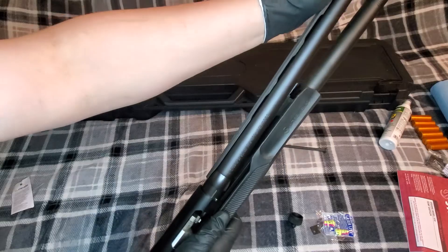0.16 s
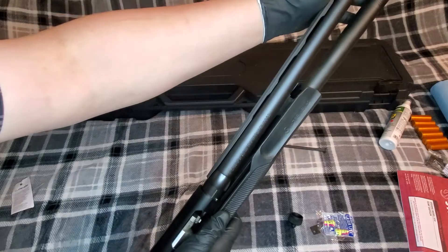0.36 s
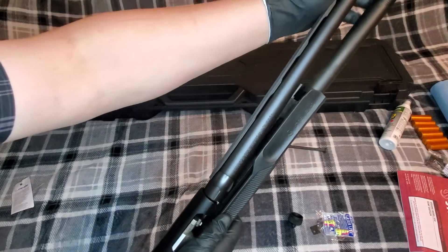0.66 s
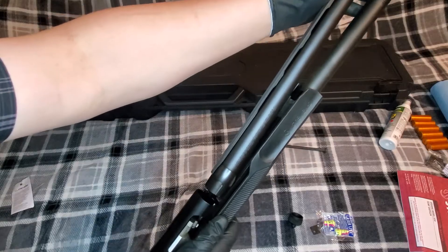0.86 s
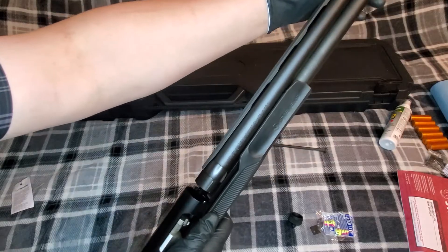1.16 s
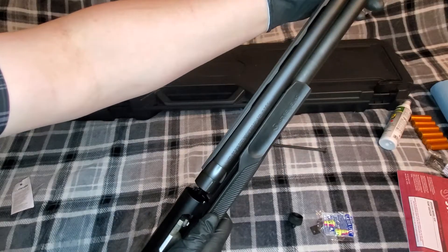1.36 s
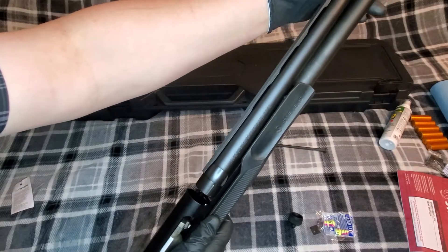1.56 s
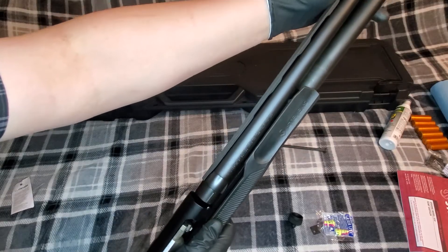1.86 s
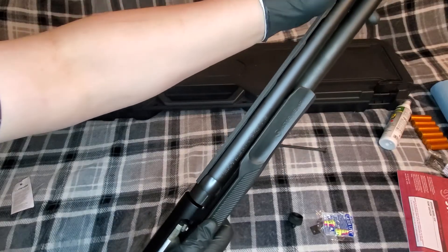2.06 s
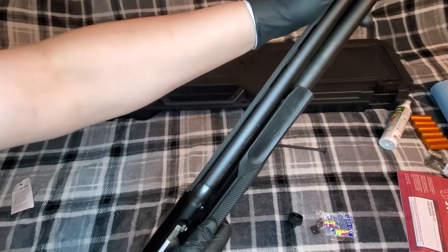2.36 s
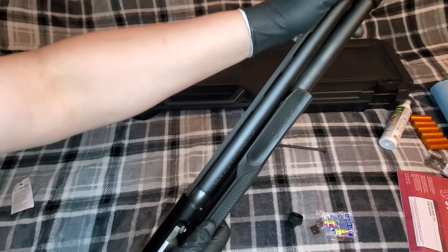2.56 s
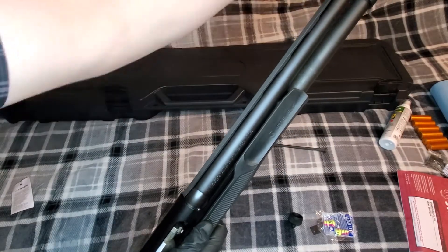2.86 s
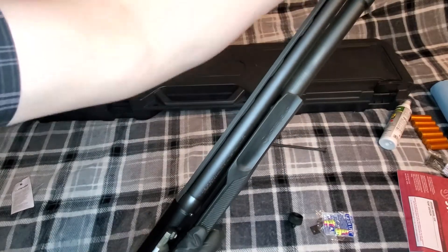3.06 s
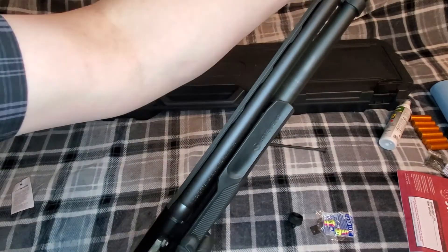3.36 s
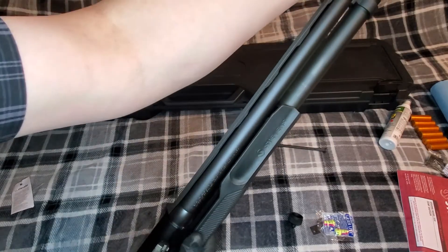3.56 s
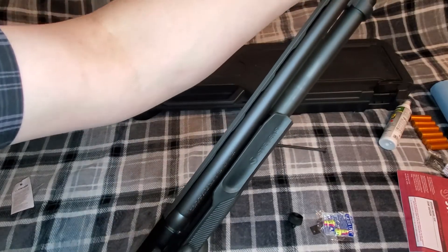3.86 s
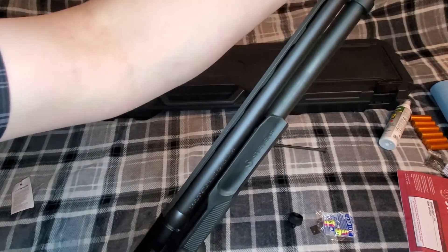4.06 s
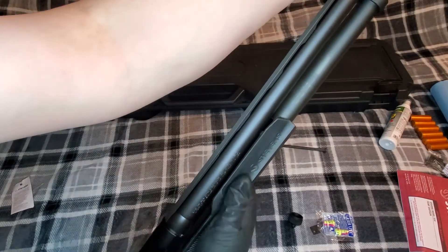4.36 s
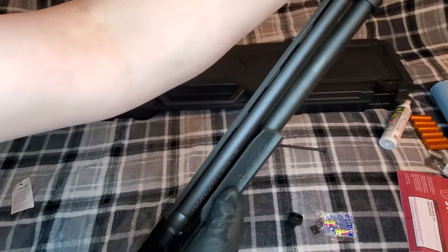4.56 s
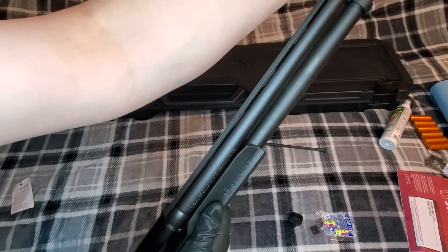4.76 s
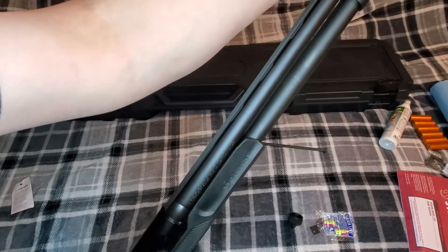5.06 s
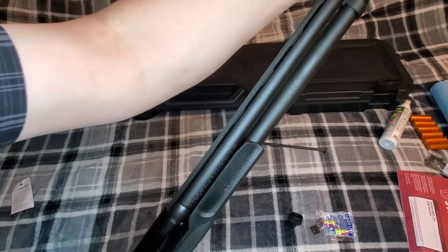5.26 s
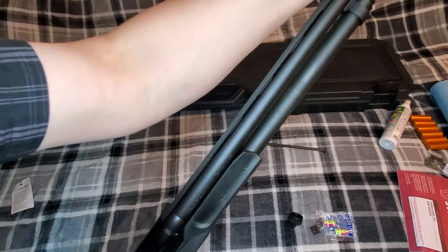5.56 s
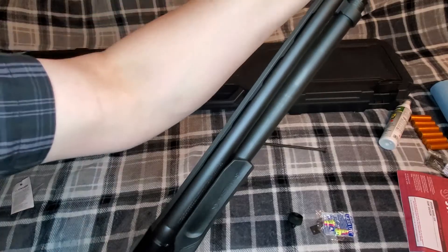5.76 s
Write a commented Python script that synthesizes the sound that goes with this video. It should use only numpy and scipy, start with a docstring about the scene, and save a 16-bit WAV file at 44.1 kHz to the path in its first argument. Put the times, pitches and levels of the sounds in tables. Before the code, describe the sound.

Hollow steel parts are fitted together by gloved hands: scattered ringing taps, faint scraping, a hard double clack, and a quick cluster of clicks. After a pause with sleeve rustle come isolated clicks, a brief squeak and a rough sliding rattle ending in bright snaps. Glove swishes finish it. Dry, close indoor sound with a short soft room tail over low mains hum.

```python
"""In a bedroom, gloved hands fit a steel barrel and a sliding forend to a receiver, close to a small microphone.
Each knock is a noisy crack and clatter plus decaying tones for the ringing steel.
Sliding parts are rough grinding noise, and a short squeak is a gliding tone.
Sleeves, bedding and gloves are shaped hiss; thumps are low fading tones.
Steady air noise and a low wavering mains hum lie underneath."""
import sys
import numpy as np
from scipy import signal
from scipy.fft import rfft, irfft
from scipy.io import wavfile
from scipy.ndimage import uniform_filter1d

SR = 44100
rng = np.random.default_rng(int(sys.argv[2]) if len(sys.argv) > 2 else 0)


def unload_audio(sound):
    """Save the sound as a 16-bit wav file, at the path given as the first command line argument."""
    columns = np.transpose(np.atleast_2d(sound))
    # keep every value between -1 and 1, then stretch to whole-number steps
    steps = np.round(np.clip(columns, -1, 1) * 32767)
    wavfile.write(sys.argv[1], SR, steps.astype(np.int16))


N = 260366

# body, middle and treble of a noise: low_hz, high_hz
BAND_EDGES = [(380, 2000), (2000, 7200), (7200, 16500)]
# colour of metal grinding and clattering: pitch_hz, relative_db
METAL_COLOUR = [(230, -10.5), (420, 0.5), (1100, 1.5), (2500, -1), (5000, -0.46)]
# ringing tones of the barrel and of the magazine tube: pitch_hz, relative_db, ring_time (a multiple)
BARREL_MODES = [(500, -6, .6), (637, -7.5, .6), (862, -5.5, 1.0), (1235, -5, .9), (1338, -4.6, .9),
                (1548, -5.5, 1), (1715, -11, 1.1), (2143, -4, 1.7), (2490, -6.5, 1.2), (3200, -9.5, 1.5),
                (3525, -9.5, 1), (4263, -9, 1.7), (5480, -12, .9)]
TUBE_MODES = [(1163, -1, 0.55), (2740, -6.5, 0.7), (3900, -6.5, 0.26), (5724, -9.5, 0.36)]


def undb(db):
    """Turn decibels into a plain gain."""
    return 10 ** (np.asarray(db) / 20)


def unit(x):
    """Scale a sound to an rms of 1."""
    return x / np.sqrt(np.mean(x ** 2))


def colour(x, points):
    """Shape the spectrum by (Hz, dB) points on a log-frequency axis."""
    hz, db = np.transpose(points)
    log_hz = np.log(np.arange(len(x) // 2 + 1) * SR / len(x) + 1)
    gain = undb(np.interp(log_hz, np.log(hz), db))
    return irfft(rfft(x) * gain, len(x))


def bands(x):
    """Split a noise into body, middle and treble, each at rms 1."""
    layers = []
    for edges in BAND_EDGES:
        band_filter = signal.butter(2, edges, "bandpass", fs=SR, output="sos")
        layers.append(unit(signal.sosfilt(band_filter, x)))
    # flipping the middle keeps the bands in phase where they meet
    return np.array(layers) * [[1], [-1], [1]]


def ring(x, hz, t60):
    """One steel tone set ringing by x; it falls 60 dB in t60 seconds."""
    pole = np.exp(2j * np.pi * hz / SR - np.log(1000) / (t60 * SR))
    return signal.lfilter([1], [1, -pole], x).imag


def walk(rate):
    """A wandering curve: random values, rate per second, with smooth slides between them."""
    hold = int(SR / rate)
    steps = np.repeat(rng.standard_normal(N // hold + 1), hold)
    return uniform_filter1d(steps, hold)[:N]


def rustle():
    """Sleeves and bedding rub in a dull hiss whose three bands waver separately."""
    # loudness over time: time_s, level_db
    rustle_levels = [(0, -49), (.45, -59), (.8, -54.5), (1.301, -51), (1.901, -53), (2.601, -54.5),
                     (2.851, -68.5), (3.1, -47), (3.301, -61.5), (3.601, -53.5), (3.902, -64), (4.3, -53),
                     (4.9, -62), (5.452, -54), (5.62, -67), (5.9, -72.5)]
    # offsets of body, middle and treble: relative_db
    band_levels = (2.5, -14.5, -25)
    # colour of rubbing cloth: pitch_hz, relative_db
    cloth_colour = [(200, 17), (450, 9.5), (800, -1.5), (1500, -0.5), (3000, -10.5)]
    time_s, level_db = np.transpose(rustle_levels)
    t = np.arange(N) / SR
    layers = bands(colour(rng.standard_normal(N), cloth_colour))
    level = np.interp(t, time_s, level_db)
    return sum(x * undb(level + db + walk(33)) for x, db in zip(layers, band_levels))


def glove_strokes():
    """Each glove stroke over the steel is a bright swish of noise that swells and fades."""
    # strokes: peak_s, half_length_s, level_db
    strokes = [(0.157, 0.028, -57.5), (2.664, 0.025, -57), (2.733, 0.0086, -52.5), (2.863, 0.062, -49),
               (2.993, 0.022, -50), (3.434, 0.074, -58.5), (4.198, 0.011, -47), (4.349, 0.0052, -47),
               (5.043, 0.04, -44), (5.161, 0.051, -47.5), (5.444, 0.049, -47)]
    # colour of a stroke: pitch_hz, relative_db
    glove_colour = [(2000, -5), (3500, -1), (5000, 1.5), (7400, -1.5), (10000, 1), (15500, -2)]
    t = np.arange(N) / SR
    hiss = unit(colour(rng.standard_normal(N), [(20, -33)] + glove_colour))
    swish = undb(1.6 * walk(60)) * hiss
    return swish * sum(undb(db) * np.exp(-.5 * ((t - at) / half) ** 2) for at, half, db in strokes)


def room_air():
    """Steady air noise, shaped mostly towards the low end."""
    # colour of the air: pitch_hz, relative_db
    air_colour = [(24, -24), (40, -1), (114, 2), (165, -3.5), (495, -17.5), (677, -28), (1000, -29.5),
                  (3530, -42), (6440, -27.5), (7350, -39.5), (15700, -43.5)]
    return undb(-55.5) * unit(colour(rng.standard_normal(N), air_colour))


def mains_hum():
    """Two low tones that waver together in pitch and separately in level."""
    # hum before wavering: pitch_hz, rms_level_db
    hum_tones = [(59, -58), (119.8, -57.5)]
    turns = 2 * np.pi / SR * np.cumsum(1 + 0.04 * walk(6))
    return sum(np.sqrt(2) * undb(db + 0.63 * walk(28.0)) * np.sin(hz * turns) for hz, db in hum_tones)


def knocks(ping_db=-4.5, ping_s=0.0008, chatter_size=0.011,
           struck_db=-7., scatter_db=1.2, split=.009, spot_db=7., spot_width=.05):
    """Each blow is a sharp crack, then clatter and steel tones fed while the contact chatters."""
    # blows: start_s, level_db, body_db (below 2 kHz), treble_db (above 7.2 kHz),
    # tube_db (tube ring against barrel ring), tail_db (tail against crack),
    # contact_ms (until the crack peaks), spot_hz (pitch that the struck spot favours)
    blows = [(0.4972, -25.5, 2, -24, 5.5, -14, 1, 6000), (0.6525, -50.5, 0, -8, -35, 6.5, 0.83, 2148),
             (0.7237, -31, 1, -8, 5.5, -10.5, 1.8, 2820), (0.842, -51.5, 1, -8, 4, -9, 1.5, 5820),
             (0.867, -32.5, 2, -18, 18, -19.5, 0.79, 2750), (0.8813, -31, -2, 0.5, -21, -16, 0.67, 1715),
             (0.91, -40, 0, 2.5, 5, -5.5, 0.86, 5600), (1.04, -35.5, 9, -13, 7, -14, 1.6, 1580),
             (1.08, -47.5, -18, 5, 3, -13, 1, 5800), (1.4922, -42, 0, -30, 21, -12.5, 0.83, 5160),
             (1.6334, -42.5, 6, -11, 13, -7.5, 0.57, 3950), (1.713, -39.5, 13, -29, -18, -23, 1.6, 2100),
             (2.025, -35.5, -4, -14, -1, -0.5, 0.9, 2570), (2.0346, -14, 4.5, -1.5, -11, -15.5, 2.7, 1280),
             (2.1188, -34.5, 10, -14.5, -7, -6.5, 1, 1240), (2.1396, -28.5, -5, -4.5, -12, 1, 1.2, 6800),
             (2.1484, -5.5, -6, -4, 3.5, -29, 0.7, 6230), (2.411, -35, 2, -11, -6, -8, 1.1, 3440),
             (2.433, -30.5, 2, -7, -5, -10.5, 1.6, 3280), (2.447, -24.5, 2, -14, -1.5, -25, 1, 5500),
             (2.4575, -27, 11.5, -6, 0.5, -20.5, 1.5, 6240), (3.314, -57.5, 5, 10, -1, -15, 0.41, 4080),
             (3.7035, -27.5, 1, 0, -6.5, -14.5, 0.7, 3200), (4.046, -29, -40.5, 6.5, 0, -20.5, 1.45, 4980),
             (4.546, -31, 2.5, -10.5, -9, -6.5, 1.5, 4100), (4.619, -18, -0.5, 4.5, -1.5, -11, 0.83, 5200),
             (4.643, -30, 11, -13, 1, -35, 1.4, 1060), (4.659, -19, -8, -4.5, 0, -20.5, 0.71, 5330),
             (4.682, -13.5, -24.5, 9, 2.5, -18, 1, 5130)]
    # broad peaks of the first instant: pitch_hz, relative_db
    crack_peaks = [(3100, -1.5), (6200, 1), (9500, -1.5), (12700, -3.5), (15300, -2.5)]
    # the loose barrel rings freely; once seated in the receiver its ring is damped
    seated_s, loose_ring_db, seated_ring_db = 2.05, 5.5, -11
    ring_t60_s = 0.17  # scaled for each band and mode
    out, n = np.zeros(N + SR), SR // 3
    t = np.arange(n) / SR
    noise = bands(colour(rng.standard_normal(N + SR), METAL_COLOUR))
    white = rng.standard_normal(N + SR)
    hz, db, ring_time = np.transpose(BARREL_MODES + TUBE_MODES)
    crack_hz, crack_db = np.transpose(crack_peaks)
    band_t60 = ring_t60_s * np.array([[1.2], [.9], [.8]])
    mode_t60 = ring_t60_s * ring_time[:, None]
    snap = np.e * t / ping_s * np.exp(-t / ping_s)  # very short burst for the treble
    in_tube = np.arange(len(hz)) >= len(BARREL_MODES)
    chances = rng.standard_normal((len(blows), 2, len(hz)))
    for blow, chance in zip(blows, chances):
        start_s, level_db, body_db, treble_db, tube_db, tail_db, contact_ms, spot_hz = blow
        i = int(start_s * SR)
        crack_s = contact_ms / 1000
        crack = np.e * t / crack_s * np.exp(-t / crack_s)
        ring_db = loose_ring_db if start_s < seated_s else seated_ring_db
        share_db = np.array([body_db, 0, treble_db])

        # noise: a crack in every band, then the fading clatter
        clatter = (1 - np.exp(-t / crack_s)) * undb(tail_db - 60 * t / band_t60)
        burst = np.array([crack, crack, snap]) / 3
        hit = undb(share_db) @ (noise[:, i:i + n] * (burst + clatter))

        # short pings colour the first instant
        ping_hz = crack_hz * (1 + 0.055 * chance[1, :len(crack_peaks)])
        pings = np.sin(2 * np.pi * np.outer(ping_hz, t))
        ping_levels = ping_db + crack_db + treble_db * (crack_hz > BAND_EDGES[2][0])
        hit = hit + (crack * ping_s / crack_s + snap) / 2 * (undb(ping_levels) @ pings)
        hit = hit + crack * np.sin(2 * np.pi * spot_hz * t)

        # the part that is struck rings most, above all near the pitch of the spot
        mode_db = db + np.where(in_tube, tube_db, -tube_db).clip(max=0) + scatter_db * chance[0]
        mode_db = mode_db + spot_db * np.exp(-.5 * (np.log(hz / spot_hz) / spot_width) ** 2)
        share_hz = np.log([1750, 2070, 6660, 9000])
        mode_db = mode_db + np.interp(np.log(hz), share_hz, share_db[[0, 1, 1, 2]])

        # every steel tone is a slightly detuned, beating pair
        turns = 2 * np.pi * np.outer(hz * (1 + 0.006 * chance[1]), t)
        pairs = np.sin(turns) + np.sin(turns * (1 + split * chance[0, ::-1, None])) / 2
        modes = undb(mode_db) @ (pairs * undb(-60 * t / mode_t60))
        hit = hit + undb(struck_db) * crack * modes

        # one sharp tap plus brief noise keeps feeding the ring
        chatter = chatter_size * white[i:i + n] * crack + (t == 0)
        chatter = chatter / np.sqrt(np.sum(chatter ** 2))
        ringing = signal.fftconvolve(modes, chatter)[:n]
        out[i:i + n] += undb(level_db) * (hit + undb(ring_db + tail_db) * ringing)
    return out[:N]


def slides(grit_db=2.7, steel_db=-2., damp_s=.026):
    """Parts stick and slip as they slide: rough noise, some of it through the damped steel tones."""
    # slides: peak_s, rise_s and fall_s (time for 20 dB), level_db, body_db (below 2 kHz)
    slide_table = [(0.905, 0.096, 0.41, -48, 4.5), (1.558, 0.11, 0.0099, -46.5, 0),
                   (1.69, 0.067, 0.13, -43.5, 2.5), (2.021, 0.012, 0.068, -37, 4.5),
                   (2.143, 0.076, 0.11, -35.5, 6.5), (2.452, 0.079, 0.035, -34.5, 0.5),
                   (3.692, 0.023, 0.056, -34.5, -6), (4.041, 0.044, 0.1, -44.5, -1),
                   (4.534, 0.058, 0.02, -43, 7.5), (4.614, 0.038, 0.024, -33, -2.5),
                   (4.664, 0.054, 0.015, -29, 11.5), (4.7, 0.016, 0.095, -29.5, -40)]
    # extra colour of the forend on its rails: pitch_hz, relative_db
    forend_colour = [(600, -12), (1050, 1.5), (2500, -3.5), (3500, -1), (4300, 8), (5300, 6.5), (6500, 0),
                     (9000, 5)]
    forend_s, treble_db = 4.4, -15  # the forend slides from forend_s on
    t = np.arange(N) / SR
    # a new random roughness every 40 samples
    roughness = np.minimum(rng.exponential(size=N // 40 + 1), 3.5).repeat(40)[:N]
    grit = rng.standard_normal(N) * undb(grit_db * roughness)
    steel = sum(undb(db) * unit(ring(grit, hz, damp_s)) for hz, db, _ in BARREL_MODES + TUBE_MODES)
    layers = bands(colour(unit(grit) + undb(steel_db) * unit(steel), METAL_COLOUR))
    gain = 0
    for peak_s, rise_s, fall_s, level_db, body_db in slide_table:
        distance = np.where(t < peak_s, (peak_s - t) / rise_s, (t - peak_s) / fall_s)
        swell = undb(level_db - 20 * distance)
        gain = gain + np.outer(undb([body_db, 0, treble_db]), swell)
    rubbing = (layers * gain).sum(0)
    return np.where(t < forend_s, rubbing, colour(rubbing, forend_colour))


def thumps():
    """Soft low pushes through the mattress, each a fading tone."""
    # thumps: start_s, level_db, pitch_hz
    thump_table = [(1.249, -42, 95.6), (1.72, -32, 61.9), (1.901, -37.5, 53.8), (2.829, -40.5, 70.0)]
    t60_s = 0.27
    out, t = np.zeros(N + SR), np.arange(SR // 2) / SR
    for start_s, level_db, hz in thump_table:
        i = int(start_s * SR)
        envelope = undb(level_db - 60 * t / t60_s) * (1 - np.exp(-t / 0.0008))
        out[i:i + len(t)] += envelope * np.sin(2 * np.pi * hz * t)
    return out[:N]


def squeak():
    """Steel squeaks on steel: a rough tone glides up and down with rubbing speed and excites steel tones."""
    # steel tones of the squeak: pitch_hz, relative_db, t60_s
    squeak_modes = [(1264, -3.5, 0.061), (1495, -3, 0.075), (1817, 3, 0.19)]
    peak_s, half_s, level_db, bare_db = 4.0395, .009, -34, -2
    low_hz, top_hz = 1074, 1755  # ends of the glide before jitter
    t = np.arange(N) / SR
    speed = np.exp(-.5 * ((t - peak_s) / half_s) ** 2)
    hz = (low_hz + (top_hz - low_hz) * speed) * (1 + 0.015 * walk(300))
    strength = np.sqrt(speed) * undb(4 * walk(400))
    tone = strength * np.sin(2 * np.pi / SR * np.cumsum(hz))
    rings = [(db, ring(tone, mode_hz, t60)) for mode_hz, db, t60 in squeak_modes]
    ringing = sum(undb(db) * x / np.abs(x).max() for db, x in rings)
    return undb(level_db) * (undb(bare_db) * speed * tone + ringing)


def bedroom(x, t60=0.18, wet_db=-16.0, dull_hz=5080.0):
    """Walls and bedding add a short soft tail: fading noise with its treble dulled."""
    t = np.arange(SR // 2) / SR
    tail = rng.standard_normal(len(t)) * undb(-60 * t / t60) * (t > .004)
    tail = signal.lfilter(*signal.butter(1, dull_hz, fs=SR), tail)
    tail = tail / np.sqrt(np.sum(tail ** 2))
    return x + undb(wet_db) * signal.fftconvolve(x, tail)[:N]


def microphone(x):
    """The small microphone favours some pitches and weakens others."""
    # microphone colour: pitch_hz, relative_db
    mic_colour = [(300, -6.5), (6000, -0.5), (6900, -3), (7450, -13.5), (9500, -3.5), (11200, -8),
                  (13000, 1.5), (15500, -3.5)]
    return colour(x, mic_colour)


def scene():
    """Mix the metal in the room with the cloth, then add thumps, air and hum."""
    metal = bedroom(knocks() + slides() + squeak())
    hands = microphone(metal + rustle() + glove_strokes())
    return (hands + thumps() + room_air() + mains_hum())[None]


def record(dry):
    """The recorder steeply cuts everything above its top pitch."""
    top_hz = 15780
    return signal.sosfilt(signal.ellip(10, .2, 75, top_hz, fs=SR, output="sos"), dry)


dry = scene()
out = record(dry)
unload_audio(out)
```